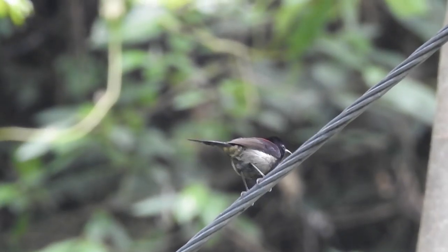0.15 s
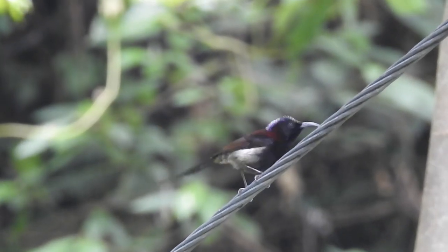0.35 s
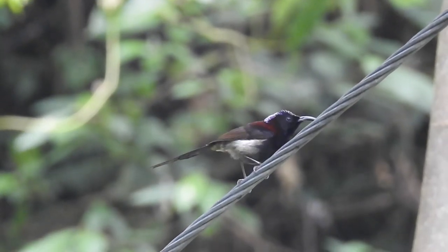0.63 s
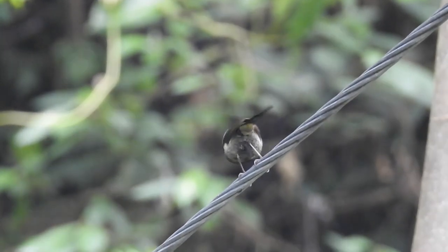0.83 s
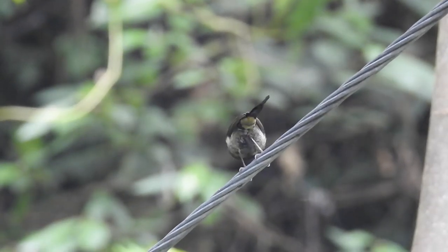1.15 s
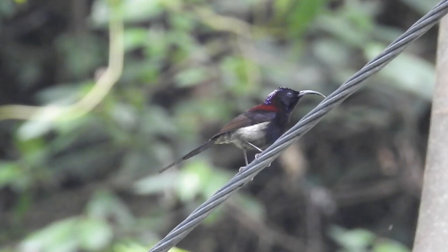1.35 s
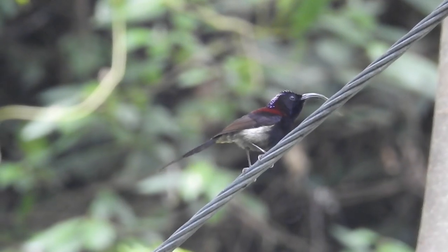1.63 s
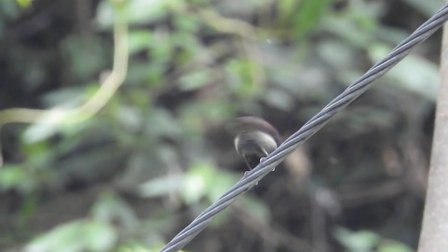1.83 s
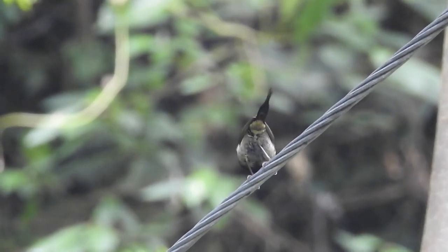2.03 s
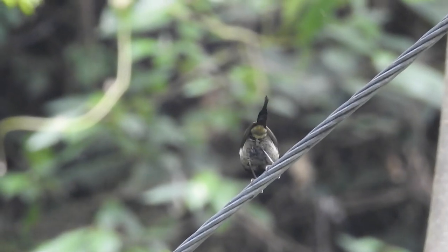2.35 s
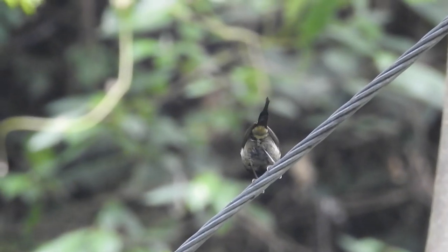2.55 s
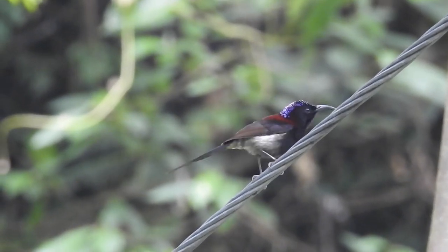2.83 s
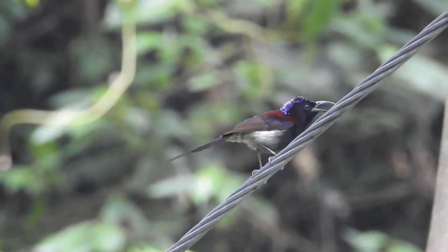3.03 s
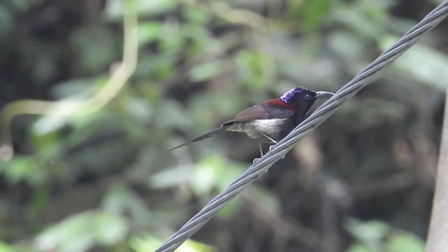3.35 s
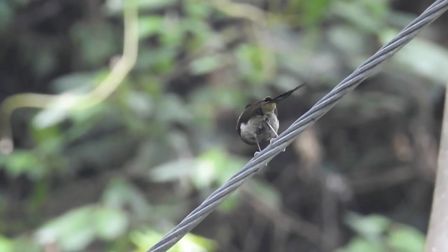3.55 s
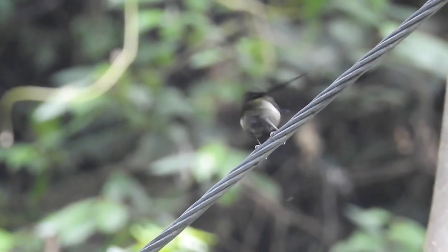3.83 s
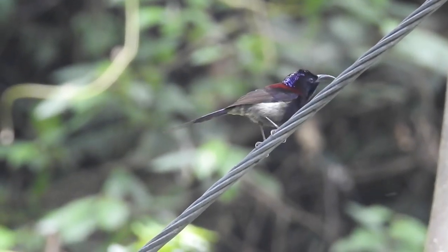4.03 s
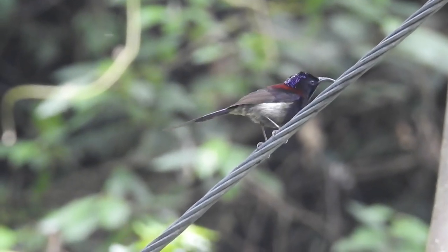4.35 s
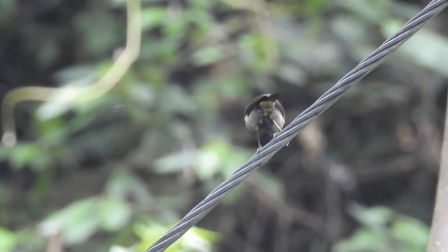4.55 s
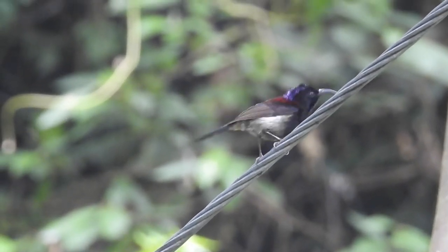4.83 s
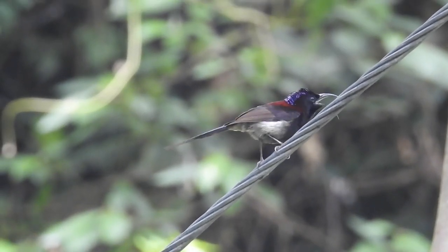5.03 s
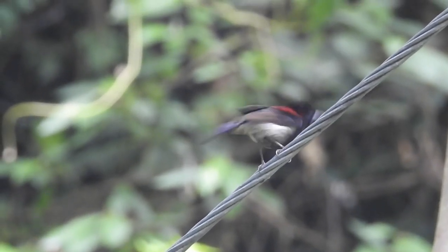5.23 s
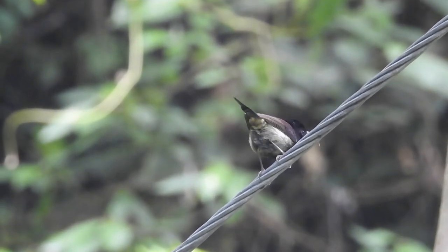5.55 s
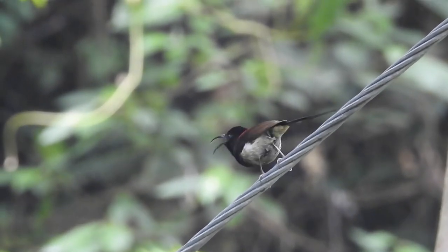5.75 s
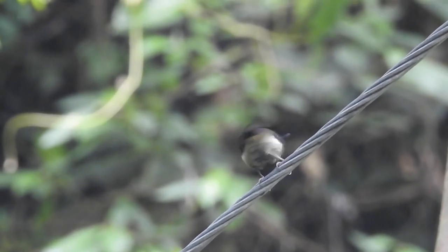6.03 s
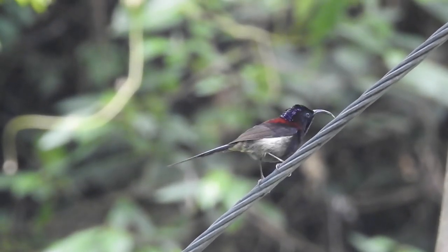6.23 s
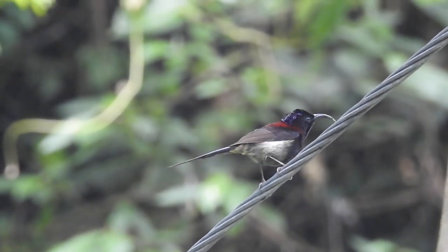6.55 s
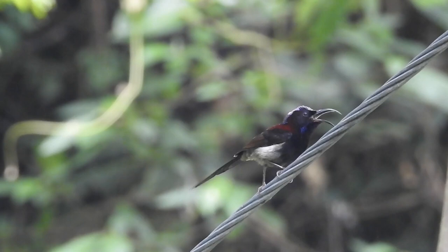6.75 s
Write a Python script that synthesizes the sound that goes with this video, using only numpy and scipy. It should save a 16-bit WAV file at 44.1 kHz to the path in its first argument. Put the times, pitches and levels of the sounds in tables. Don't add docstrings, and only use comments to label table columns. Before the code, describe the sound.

Piercing, short bird whistles rise, fall and flick over a soft bed of insect buzz, leaf hiss, far birdsong and low rumble.

```python
import sys
import numpy as np
from scipy import signal
from scipy.fft import rfft, irfft, next_fast_len
from scipy.io import wavfile
from scipy.ndimage import map_coordinates

SR = 44100
rng = np.random.default_rng(int(sys.argv[2]) if len(sys.argv) > 2 else 0)


def decibels_to_gain(level_db):
    exponent = np.asarray(level_db, float) / 20
    return 10 ** exponent


def generate_wav(signal):
    frames = np.transpose(np.atleast_2d(signal))
    scaled = np.clip(frames, -1, 1) * 32767
    pcm = np.round(scaled).astype(np.int16)
    wavfile.write(sys.argv[1], SR, pcm)


N = 303408


def noise(*shape):
    return rng.standard_normal(shape)


def unit(x):
    return x / np.sqrt(np.mean(x ** 2) + 1e-20)


def along(points, hz):
    f, v = np.transpose(points)
    return np.interp(np.log(hz + 1), np.log(f + 1), v)


def curves(rows, size):
    s, *cols = np.transpose(rows)
    return [np.interp(np.arange(size) / SR, s, c) for c in cols]


def wobble(rate, size):
    knots = noise(int(size * rate / SR) + 4)
    return map_coordinates(knots, [np.arange(size) * rate / SR])


def filtered(x, response):
    m = next_fast_len(N + 8192)
    return irfft(rfft(x, m) * response(np.fft.rfftfreq(m, 1 / SR)), m)[..., :N]


def rush(gain, alike):
    def turned(hz):
        angle = np.arccos(np.clip(alike(hz), -1, 1)) / 2
        return gain(hz) * [np.cos(angle), np.sin(angle)]

    mid, side = filtered(noise(2, N), turned)
    return unit(np.array([mid + side, mid - side]))


def whistle(hz, db, shake_hz, flutter_db, pace=300):
    phase = 2 * np.pi * np.cumsum(hz + shake_hz * wobble(pace, size=len(hz))) / SR
    level = decibels_to_gain(db + flutter_db * wobble(120, size=len(hz)))
    overtone_db = -37 - 12.5 * np.abs(hz - 4500) / 1000
    return level * (np.sin(phase) + decibels_to_gain(overtone_db) * np.sin(2 * phase))


def add(out, note, s, pan_db, echo_db, near_t60=0.42, close_db=8, alike=0.52):
    t = np.arange(2 * SR // 5) / SR
    shared, own = noise(len(t)), noise(2, len(t))
    share = np.clip(alike, 0, 1)
    tail = np.sqrt(share) * shared + np.sqrt(1 - share) * own
    tail *= 1 - np.exp(-t / 0.0039)
    tail *= decibels_to_gain(close_db - 60 * t / 0.059) + decibels_to_gain(-60 * t / near_t60)
    tail *= np.cos(np.pi / 2 * t / t[-1])
    path = decibels_to_gain(echo_db) * unit(tail) / np.sqrt(len(t))
    path[:, 0] = 1
    heard = signal.fftconvolve(note[None], path * decibels_to_gain([[pan_db / 2], [-pan_db / 2]]), axes=1)
    start = max(round(s * SR), 0)
    out[:, start:start + heard.shape[1]] += heard[:, :N - start]


def stroke(length_s, start_hz, settle_hz, glide_s, attack_s, release_s, db, fade_db,
           delay_s=0, sag_hz=0, drop_hz=0, drop_s=0.013, drop_power=2):
    t = np.arange(int(length_s * SR)) / SR

    def last(s):
        return np.clip(1 - (length_s - t) / s, 0, 1)

    hz = settle_hz + (start_hz - settle_hz) * np.exp(-t / glide_s)
    hz = hz - sag_hz * t / length_s - drop_hz * last(drop_s) ** drop_power
    gain = np.clip(t / attack_s, 0, 1) ** 2 * (1 - last(release_s)) ** 2
    return delay_s, hz, gain * decibels_to_gain(db - fade_db * t / length_s)


def hoarse_note(length_s, hz, spread_hz, db):
    u = np.linspace(0, 1, int(length_s * SR))
    thrown = hz + 1.4 * spread_hz * np.tanh(wobble(1800, size=len(u)))
    return np.sin(np.pi * u) ** 0.28 * whistle(thrown, db, shake_hz=30, flutter_db=3.5)


def sunbird_voice(hz, db, hoarse):
    return whistle(hz, db, shake_hz=150 * hoarse, flutter_db=1.5 + 0.92 * hoarse, pace=450)


RISE = dict(length_s=.094, start_hz=4480, settle_hz=6398, glide_s=.0095, sag_hz=329.8, drop_hz=600, attack_s=0.015, release_s=0.0078, db=-2.5, fade_db=-0.5)
FALL = dict(length_s=.134, start_hz=8450, settle_hz=7566, glide_s=.006, sag_hz=-31, drop_hz=619, drop_s=.078, drop_power=1, attack_s=0.018, release_s=0.021, db=-1.5, fade_db=0.4)
DIVE = dict(length_s=.05, start_hz=9200, settle_hz=4000, glide_s=.0082, attack_s=0.0096, release_s=.008, db=10, fade_db=42)
ARCH = dict(length_s=.12, start_hz=6730, settle_hz=7485, glide_s=.019, drop_hz=100, attack_s=0.014, release_s=.022, db=-6, fade_db=3)
CHIP = dict(length_s=.036, start_hz=4080, settle_hz=4437, glide_s=0.0025, drop_hz=2530, drop_s=.025, drop_power=1.1, attack_s=0.0071, release_s=0.0073, db=14, fade_db=45)
FLICK_A = dict(length_s=0.055, start_hz=4900, settle_hz=7800, glide_s=.021, attack_s=0.01, release_s=0.018, db=0.4, fade_db=4.5)
FLICK_B = dict(delay_s=.042, length_s=.038, start_hz=4300, settle_hz=10700, glide_s=.036, drop_hz=1500, drop_s=.016, drop_power=1.2, attack_s=.017, release_s=.021, db=8, fade_db=5)
FLICK_ECHO = dict(delay_s=.049, length_s=.028, start_hz=4400, settle_hz=10200, glide_s=0.04, attack_s=.014, release_s=.011, db=-0.5, fade_db=1)
FLICK_HIGH = dict(delay_s=.005, length_s=.051, start_hz=6680, settle_hz=6620, glide_s=.005, sag_hz=-3300, attack_s=.007, release_s=.006, db=-17, fade_db=25.5)
# start in seconds, level in dB, pitch factor, length factor, left over right in dB.
RISES = [
    (0.887, -10.5, 1.02, 1.18, -2),
    (2.168, -9, 1.008, 1.08, 0),
    (3.05, -9, 1, 1.05, 2),
    (3.826, -9, 1, 1.1, 1),
    (4.019, -11.5, 1.005, 1.07, 3),
    (6.148, -9, 1.013, 1, 2.9),
]
FALLS = [
    (1.931, -8, 1.007, 1.09, 3.7),
    (3.592, -10, 0.98, 1.136, 1),
    (6.741, -9.5, .99, 1.01, 2.5),
]
FLICKS = [
    (0.327, -17.5, 1.017, 0.93, 2.5),
    (2.788, -17, 0.96, 0.91, 2),
    (4.617, -16.5, 1.014, 1.01, 2.5),
    (5.833, -18, 0.97, 0.83, 2.5),
]
DIVES = [
    (1.548, -15.5, 1.056, 1.01, 1.5),
    (5.336, -20.5, 1.034, 1.01, 2.4),
]
CHIPS = [
    (.948, -18.5, 1.01, 0.97, 4.8),
    (1.013, -17.5, 0.995, 0.9, 3.6),
    (1.109, -18, 1.005, 0.89, 6.1),
    (1.192, -16.5, 1.005, 0.88, 5),
]
ARCHES = [
    (5.054, -7.5, 0.99, 1.01, 5.3),
]


def pulsed_calls(out):
    flick = [FLICK_A, FLICK_B, FLICK_ECHO, FLICK_HIGH]
    # pulses, calls, hoarseness, echo in dB
    kinds = [([RISE], RISES, .45, 2.4), ([FALL], FALLS, .15, -1.2), ([DIVE], DIVES, .2, 5.2),
             (flick, FLICKS, .6, 3.5), ([CHIP], CHIPS, .7, -3.5), ([ARCH], ARCHES, .15, .6)]
    for shapes, calls, hoarse, echo_db in kinds:
        usual_db = np.mean([call[1] for call in calls])
        for s, db, pitch, stretch, pan_db in calls:
            note = np.zeros(SR // 5)
            for shape in shapes:
                delay_s, hz, gain = stroke(**shape)
                slow = np.arange(int(len(hz) * stretch)) / stretch
                gain = np.interp(slow, np.arange(len(gain)), gain)
                hz = np.interp(slow, np.arange(len(hz)), hz)
                pulse = gain * sunbird_voice(pitch * hz, db, hoarse)
                note[round(delay_s * stretch * SR):][:len(hz)] += pulse
            add(out, note, s, pan_db, echo_db + usual_db - db)


# time from the start in seconds, pitch in Hz, level in dB.
CLIMB = [(0, 3700, -37.5), (.03, 3900, -15.5), (.05, 4970, -10), (.062, 6110, -8.5), (.12, 6550, -7.5),
         (.16, 7000, -11.5), (.2, 7630, -15), (.22, 7800, -42.5)]
DIP = [(0, 5960, -20.5), (.012, 5510, -3), (.028, 4920, -14), (.05, 5540, -3), (.065, 6180, -4),
       (.09, 6000, -2.5), (.105, 5830, -8.5), (.112, 5640, -29.5)]
HOP = [(0, 5050, -28.5), (.008, 5530, -0.5), (.025, 5233, -6.5), (.045, 5220, -0.5), (.06, 6064, -1),
       (.095, 5950, -2), (.11, 5704, 5), (.118, 5670, -33)]
# note shape, start in seconds, level in dB, left over right in dB.
WARBLES = [
    (CLIMB, .447, -11.5, 2.5),
    (DIP, .513, -10.5, 1.8),
    (HOP, 4.797, -14, 2.5),
]


def winding_calls(out):
    for shape, s, db, pan_db in WARBLES:
        hz, level_db = curves(shape, size=int(shape[-1][0] * SR))
        floor_db = max(shape[0][2], shape[-1][2])
        fade = np.clip((level_db - floor_db) / 6, 0, 1)
        add(out, fade * sunbird_voice(1.005 * hz, db + level_db, hoarse=0.3), s, pan_db, echo_db=1.3)


RASP = dict(length_s=0.071, hz=6580, spread_hz=2000, db=-21.5)


def flick_rasps(out):
    for s, db, *_ in FLICKS:
        add(out, decibels_to_gain(db) * hoarse_note(**RASP), s, pan_db=2.0, echo_db=1.5)


def sunbird():
    out = np.zeros((2, N))
    pulsed_calls(out)
    winding_calls(out)
    flick_rasps(out)
    return out


LOW_WHISTLE = dict(length_s=.645, hz=2148, db=-33.5, swell_db=4.5, swells_per_s=10.2, first_swell_s=.063, arch_hz=18)


def low_whistler(length_s, hz, db, swell_db, swells_per_s, first_swell_s, arch_hz):
    out = np.zeros((2, N))
    t = np.arange(int(length_s * SR)) / SR
    swell = np.cos(2 * np.pi * swells_per_s * (t - first_swell_s))
    bead_phase = np.pi * np.cumsum(33 + 4 * wobble(9, size=len(t))) / SR
    beads = np.abs(np.cos(bead_phase)) ** 0.45
    ends = np.sin(np.linspace(0, np.pi, len(t))) ** .2
    tone = whistle(hz + arch_hz * swell, db + swell_db * swell, shake_hz=9.6, flutter_db=1.5)
    add(out, ends * beads * tone, 0, pan_db=4.5, echo_db=-2, near_t60=1.0, close_db=-1)
    return out


# length in seconds, start pitch in Hz, end pitch in Hz.
STAIR = [
    (.087, 2780, 2830),
    (.075, 2745, 2827),
    (.105, 2761, 2915),
    (.1, 2900, 3030),
    (.11, 2990, 3110),
    (.078, 3100, 3450),
]
# start in seconds, level in dB.
STAIRS = [
    [(1.615, -31), (1.859, -28), (2.102, -28.5), (2.344, -30.5), (2.565, -31.5), (2.811, -31)],
    [(4.752, -29), (5.007, -31), (5.233, -33), (5.483, -31.5), (5.713, -29.5), (5.962, -30)],
]
# length in seconds, start pitch in Hz, end pitch in Hz.
HOOK = (.05, 3350, 3980)
SIGH = (0.058, 3900, 3110)
# start in seconds, level in dB.
HOOKS = [
    (.304, -37.5),
    (.563, -37),
    (.826, -35.5),
    (4.64, -41.5),
    (4.893, -40),
    (6.552, -39),
    (6.819, -40),
]
SIGHS = [
    (4.505, -49),
    (6.373, -43.5),
    (6.676, -45),
]
# start in seconds, length in seconds, start pitch in Hz, end pitch in Hz, level in dB.
ANSWERS = [(0.425, 0.032, 3170, 3290, -45.5), (1.625, 0.021, 3070, 4270, -29),
           (1.694, .025, 2950, 3460, -37.5), (2.627, 0.066, 3550, 3686, -38),
           (2.731, 0.044, 2980, 3148, -35), (5.024, 0.09, 3055, 3254, -41), (5.276, 0.037, 3245, 3334, -34),
           (5.41, 0.031, 3600, 4280, -37), (5.539, 0.023, 3370, 3390, -34), (5.621, .08, 2950, 2975, -39.5),
           (5.766, 0.066, 3505, 3716, -37), (5.999, .05, 3485, 3776, -40)]
THIN_LEFT = [
    (1.257, 0.094, 7170, 7670, -53.5),
    (1.64, 0.013, 4300, 4360, -31),
    (1.697, 0.031, 4270, 7090, -29.5),
    (1.794, .07, 8030, 7480, -55.5),
    (3.957, 0.05, 7680, 6700, -41),
    (4.371, 0.052, 9310, 7580, -60),
]


def far_whistlers(out):
    stairs = [(s, *step, db) for song in STAIRS for step, (s, db) in zip(STAIR, song)]
    hooks = [(s, *HOOK, db) for s, db in HOOKS]
    sighs = [(s, *SIGH, db) for s, db in SIGHS]
    for notes, pan_db in [(stairs, .3), (hooks, 4), (sighs, -.6), (ANSWERS, 1.3), (THIN_LEFT, 8)]:
        for s, length, start_hz, end_hz, db in notes:
            u = np.linspace(0, 1, int(length * SR))
            hz = end_hz + (start_hz - end_hz) * (1 - u) ** 2.18
            note = np.sin(np.pi * u) ** 0.39 * whistle(hz, db, shake_hz=19.9, flutter_db=1.5)
            add(out, note, s, pan_db, echo_db=1.0, near_t60=0.73, close_db=4.0)


# length in seconds, centre pitch in Hz, level in dB.
SCOLDS = [(0.05, 4300, -43), (.1, 3300, -48), (0.068, 5500, -29), (0.06, 3650, -47), (0.15, 4600, -38),
          (0.13, 4300, -49), (0.075, 3500, -48.5), (0.09, 3300, -46), (0.081, 4000, -40),
          (0.027, 5700, -30), (.06, 5200, -37), (0.094, 5400, -31)]
SCOLD_S = [0.0, .15, 1.845, 2.055, 2.375, 3.6, 4.5, 5.03, 5.41, 5.525, 6.29, 6.8]


def far_scolds(out):
    for s, (length, hz, db) in zip(SCOLD_S, SCOLDS):
        add(out, hoarse_note(length, hz, .17 * hz, db), s, pan_db=3.5, echo_db=0)


def far_birds():
    out = np.zeros((2, N))
    far_whistlers(out)
    far_scolds(out)
    return out


def trees(birds, level_db, t60):
    t = np.arange(SR + SR // 4) / SR
    build_up = 1 - np.exp(-t / .08)
    tail = unit(noise(2, len(t)) * build_up * decibels_to_gain(-60 * t / t60)) / np.sqrt(len(t))
    dull = signal.sosfilt(signal.butter(6, 7000, fs=SR, output="sos"), tail)
    return birds + decibels_to_gain(level_db) * signal.oaconvolve(birds, dull, axes=1)[:, :N]


def insect_chorus():
    def band(hz):
        return 1 / (1 + ((hz - 6050) / 330) ** 2) ** 1.115

    throb = 1 + 0.33 * np.sin(2 * np.pi * np.cumsum(34 + 5 * wobble(3.7, size=N)) / SR)
    level = decibels_to_gain(-39 + 2.7 * wobble(8.3, size=N))
    return level * throb * rush(band, lambda hz: .5 + 0 * hz)


# time in seconds, level in dB.
TRILL = [
    (0.0, -61),
    (.5, -52.5),
    (2.85, -47),
    (3.5, -44),
    (4.2, -49),
    (4.7, -40.5),
    (5.2, -48.5),
    (6.88, -44),
]


def insect_trill(out):
    trill_db, = curves(TRILL, size=N)
    u = np.cumsum(20.3 + 2.9 * wobble(5, size=N)) / SR % 1
    pulse = np.sin(np.pi * np.clip(u / 0.47, 0, 1)) ** 2
    tone = whistle(5050 - 1100 * u, trill_db + 3 * wobble(13, size=N), shake_hz=96.0, flutter_db=2.0)
    add(out, pulse * tone, 0, pan_db=7.0, echo_db=0.0, near_t60=0.38)


def insects():
    out = insect_chorus()
    insect_trill(out)
    return out


# level in dB, centre in Hz, 60 dB decay time in seconds.
TICK = (-39.5, 9501, 0.0056)


def leaf_drop():
    db, hz, t60 = TICK
    t = np.arange(SR // 50) / SR
    edges = [max(hz - 2200, 100), min(hz + 3500, SR / 2 - 100)]
    bandpass = signal.butter(2, edges, "band", fs=SR, output="sos")
    burst = signal.sosfilt(bandpass, decibels_to_gain(-60 * t / t60) * noise(len(t)))
    return np.pad(decibels_to_gain(db + 16.5) * burst, (round(5.108 * SR), N))[:N]


# frequency in Hz, level in dB per Hz.
LEAVES = [(1500, -31), (2500, -20), (3300, -14.5), (4500, -7), (5500, -0.5), (7000, -11), (8000, -22),
          (9000, -29.5), (11000, -30.5), (15500, -45)]
# time in seconds, level in dB.
HISS = [
    (0.0, -39.5),
    (1.0, -40.5),
    (2.2, -48),
    (4.4, -48.5),
    (5.8, -45.5),
    (6.88, -42),
]


def leaf_hiss():
    spectrum = [(800, -120)] + LEAVES + [(16500, -120)]
    hiss = rush(lambda hz: decibels_to_gain(along(spectrum, hz)), lambda hz: 0.39 + 0 * hz)
    return decibels_to_gain(curves(HISS, size=N)[0] + 1.5 * wobble(3.8, size=N)) * hiss


# frequency in Hz, level in dB per Hz.
AIR = [(15, -62), (25, -38.5), (44, -14.5), (80, -1), (108, -4.5), (146, 0), (389, -11.5), (738, -19),
       (997, -27.5), (2310, -40), (3000, -33), (3900, -49), (6600, -120)]
# frequency in Hz, likeness from 0 to 1.
ALIKE = [(30, 0.97), (400, 0.98), (1500, 0.84), (3000, 0.66)]


def distant_rumble():
    rumble = rush(lambda hz: decibels_to_gain(along(AIR + [(4000, -120)], hz)), lambda hz: along(ALIKE, hz))
    return decibels_to_gain(-36.5 + 0.96 * wobble(2.98, size=N)) * decibels_to_gain([[.9], [-.9]]) * rumble


def scene():
    near = trees(sunbird() + low_whistler(**LOW_WHISTLE), level_db=-15.0, t60=0.76)
    far = trees(far_birds(), level_db=-8.0, t60=1.78)
    return near + far + insects() + leaf_drop() + leaf_hiss() + distant_rumble()


def low_pass(x):
    return signal.sosfilt(signal.butter(12, 15830, fs=SR, output="sos"), x)


def record(dry):
    held = dry / (1 + np.abs(dry / 0.74) ** 30) ** (1 / 30)
    return low_pass(held)


dry = scene()
out = record(dry)
generate_wav(out)
```